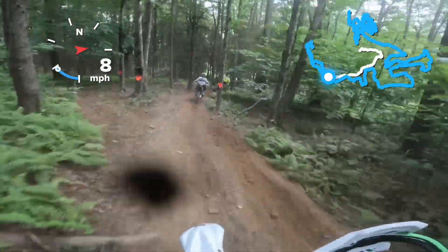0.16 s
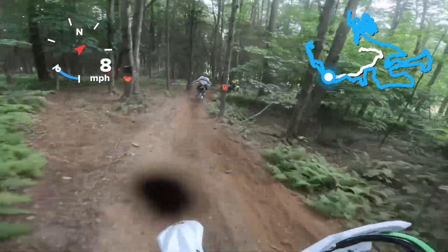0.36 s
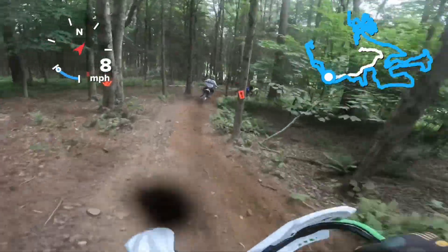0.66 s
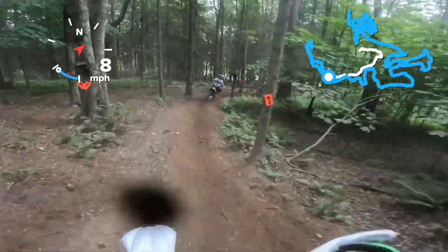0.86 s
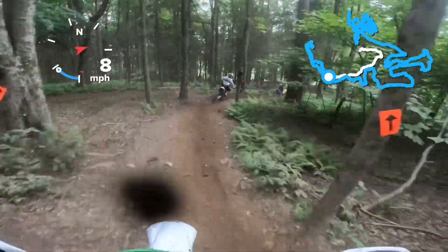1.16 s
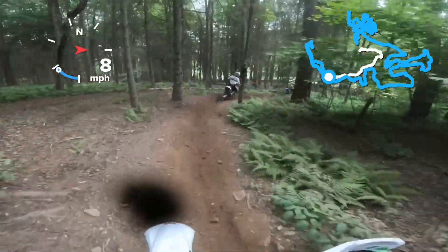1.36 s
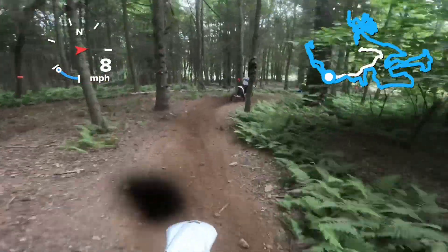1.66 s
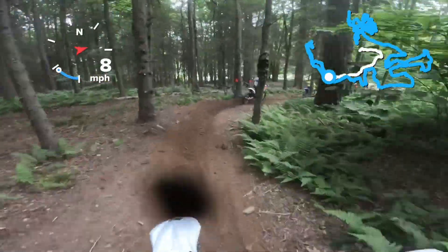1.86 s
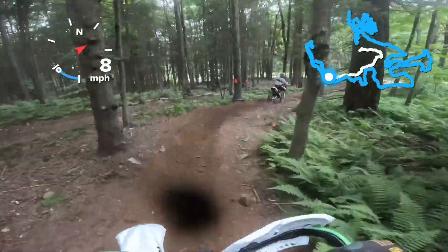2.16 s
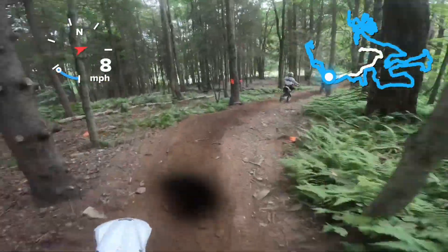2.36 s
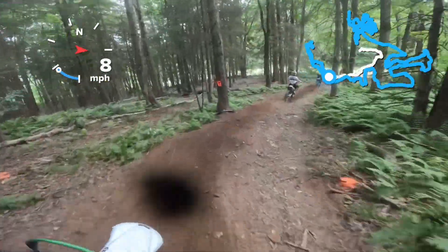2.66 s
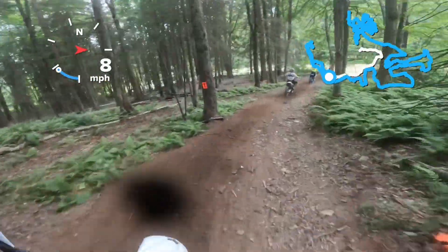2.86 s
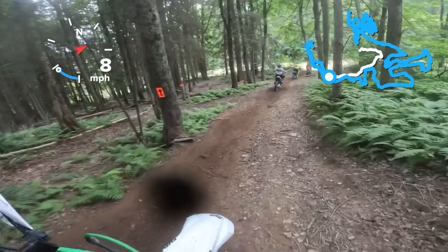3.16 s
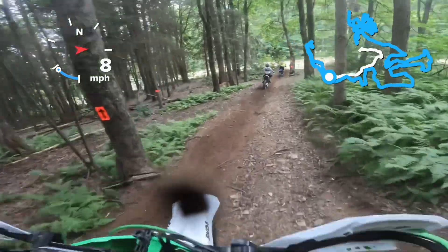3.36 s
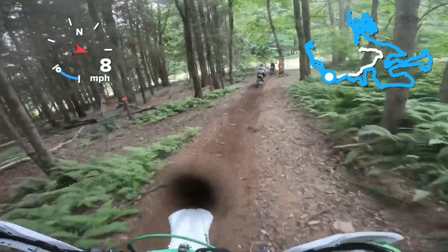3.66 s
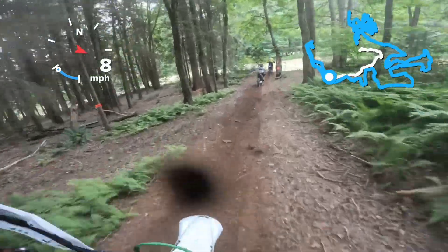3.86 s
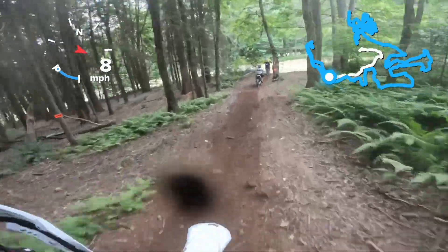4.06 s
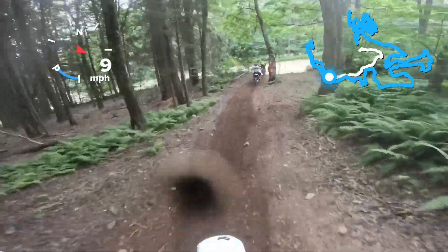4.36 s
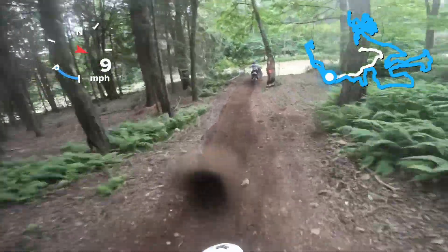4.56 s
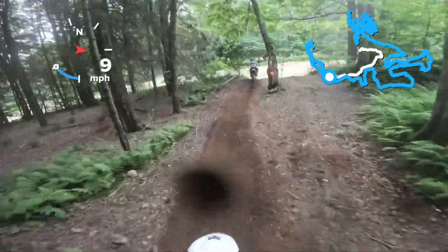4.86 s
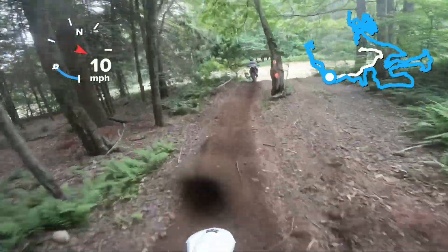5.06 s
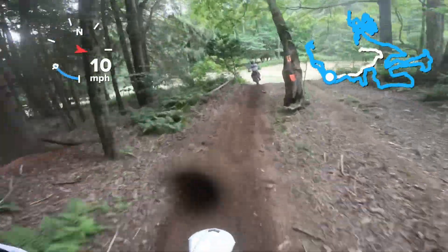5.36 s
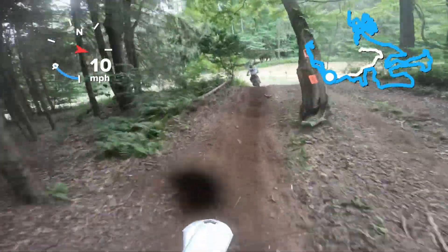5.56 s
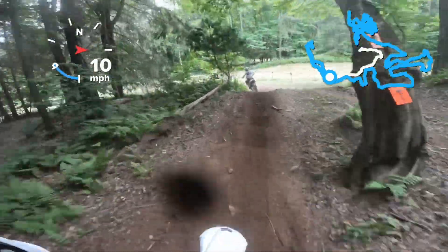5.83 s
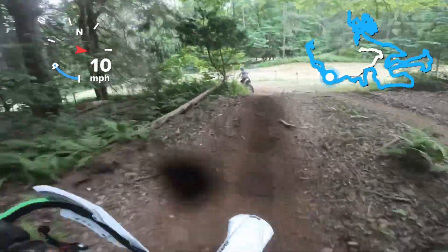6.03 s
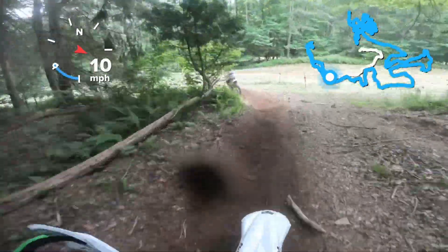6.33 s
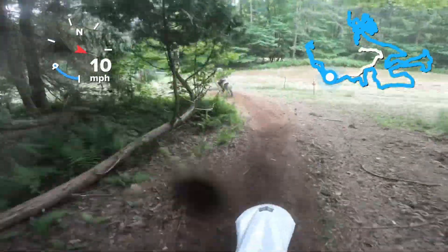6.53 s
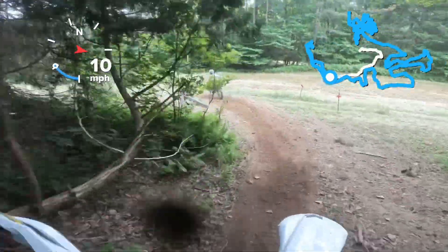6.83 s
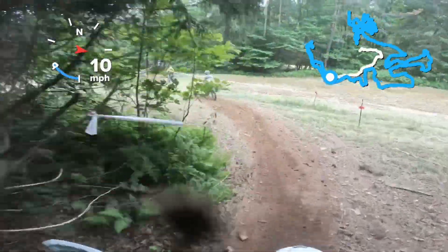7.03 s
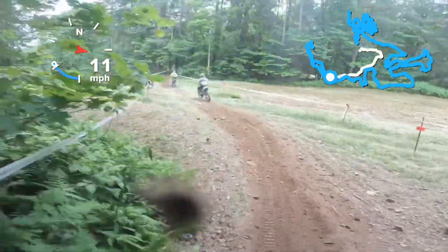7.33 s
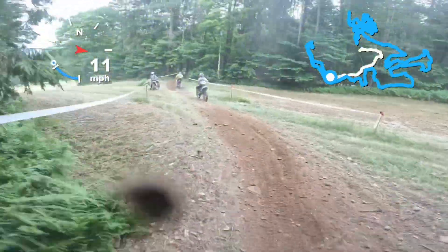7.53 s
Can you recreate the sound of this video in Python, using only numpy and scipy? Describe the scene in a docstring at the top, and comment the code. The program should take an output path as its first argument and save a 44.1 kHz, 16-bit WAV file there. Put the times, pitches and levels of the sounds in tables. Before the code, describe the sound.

A single-cylinder two-stroke dirt bike climbs a forest trail, heard from the rider's helmet. Its exhaust pops unevenly and misfires at low revs, under a metallic engine rattle, a faint gear whine and low wind buffeting. Stones knock and chassis parts clink. Past the middle the throttle opens briefly and the engine pings sharply. A second bike then revs twice nearby while the first drops back to a sputter.

```python
"""Exhaust pops, some misfiring, under metallic engine rattle and low wind buffeting: a single-cylinder
two-stroke dirt bike climbs a forest trail, heard from the rider's helmet. Each firing rings the pipe;
the crank gates noise through fins and housing. Gears whine, stones and gear knock, the chassis clinks,
and the engine pings at high revs. Near the end a second bike revs twice nearby."""
import sys
import numpy as np
from scipy import signal
from scipy.fft import rfft, irfft, next_fast_len
from scipy.io import wavfile
from scipy.ndimage import uniform_filter1d

SR = 44100
rng = np.random.default_rng(int(sys.argv[2]) if len(sys.argv) > 2 else 0)


def wav_record(signal):
    """Record a signal, one row per channel, as 16-bit PCM in the file named by sys.argv[1]."""
    frames = np.transpose(np.atleast_2d(signal))
    bounded = np.clip(frames, -1, 1)
    # unit amplitude maps onto the largest positive 16-bit level
    quanta = np.round(bounded * 32767).astype(np.int16)
    wavfile.write(sys.argv[1], SR, quanta)


N = 339129
TIME = np.arange(N) / SR
FFT_SIZE = 2 * next_fast_len(N // 2 + 4096)
HZ = np.fft.rfftfreq(FFT_SIZE, 1 / SR)

# Crank speed, one firing a turn. Each row: time in seconds, rate in Hz.
CRANK_HZ = [(0, 38.68), (0.26, 26.85), (0.42, 32.76), (0.74, 34.72), (1, 28.07), (1.28, 30.34),
            (1.42, 22.19), (1.6, 21.62), (1.72, 26.35), (2.04, 31.2), (2.48, 31.01), (2.6, 24.53),
            (2.8, 32.05), (3.08, 31.11), (3.22, 34.5), (3.56, 33.39), (3.68, 28.77), (3.86, 34.85),
            (4.26, 35.04), (4.38, 37), (4.55, 42.6), (4.63, 40.6), (4.76, 45.3), (4.84, 39.8), (4.94, 38.8),
            (5.04, 40.6), (5.17, 42), (5.36, 41.3), (5.45, 41.9), (5.65, 44.3), (5.84, 41), (6.02, 43.42),
            (6.32, 39.5), (6.44, 30.8), (7.2, 30.23), (7.7, 38.47)]
# Engine levels. Each row: time in seconds, then rattle, pop and drone level in dB.
ENGINE_DB = [(0, -35, -17.5, -35), (0.3, -35.5, -15.5, -32), (0.8, -35, -17, -33.5),
             (1.45, -39.5, -18.5, -41), (2.1, -39.5, -21.5, -49), (2.55, -38, -19, -29.5),
             (2.95, -38, -19, -40), (3.3, -38.5, -22.5, -42.5), (3.68, -38.5, -20, -33.5),
             (3.8, -35, -17, -36), (4.25, -35.5, -18, -29), (4.45, -33, -12.5, -25),
             (4.62, -32.5, -13, -23.5), (4.71, -29.5, -9, -29), (4.77, -30.5, -12.5, -45),
             (4.795, -31, -14, -37), (4.808, -33.5, -17.5, -30), (5.35, -37.5, -22.5, -29),
             (5.52, -32.5, -17.5, -27), (5.9, -34.5, -22, -29.5), (6.3, -35.5, -21.5, -26.5),
             (6.7, -39.5, -21.5, -51), (7.05, -40, -21.5, -53), (7.3, -39, -18, -37.5),
             (7.5, -38, -18.5, -34), (7.69, -36, -17, -32)]


def amp(db):
    """Decibels to gain."""
    return 10 ** (np.asarray(db) / 20)


def unit_rms(x):
    """Scale to rms 1."""
    return x / np.sqrt(np.mean(x ** 2) + 1e-20)


def spectrum(points):
    """Interpolate a table over log frequency."""
    hz, value = np.transpose(points)
    return np.interp(np.log(HZ + 1), np.log(hz + 1), value)


def curves(rows):
    """Interpolate each column over time."""
    times_s, *columns = np.transpose(rows)
    return [np.interp(TIME, times_s, column) for column in columns]


def drift(samples):
    """Smoothed noise, rms 1."""
    return unit_rms(uniform_filter1d(uniform_filter1d(rng.standard_normal(N), samples), samples))


def spell(start_s, end_s, rise_s, fall_s):
    """Trapezoid with ramps centred on start and end."""
    corners_s = [start_s - rise_s / 2, start_s + rise_s / 2, end_s - fall_s / 2, end_s + fall_s / 2]
    return np.interp(TIME, corners_s, [0, 1, 1, 0])


def ring(modes, rise_s):
    """Decaying sines, soft onset, peak 1. Each mode: frequency in Hz, level in dB, T60 in seconds."""
    t = np.arange(4000) / SR
    sound = sum(amp(db - 60 * t / t60_s) * np.sin(2 * np.pi * hz * t) for hz, db, t60_s in modes)
    sound *= 1 - np.exp(-(t / rise_s) ** 2)
    return sound / abs(sound).max()


def minimum_phase(db):
    """Causal response for a gain curve, power gain 1."""
    log_gain = np.log(amp(np.maximum(db, db.max() - 100)))
    response = np.exp(np.conj(signal.hilbert(np.r_[log_gain, log_gain[-2:0:-1]])))[:len(HZ)]
    return response / np.sqrt(np.mean(abs(response) ** 2))


def firings(turns, load, coast):
    """One impulse a turn, sized by how well the charge burns."""
    # Firings that hardly burn, and that half burn. Each entry: time in seconds.
    misfires_s = [0.038, 0.156, 0.257, 0.329, 0.396, 0.463, 0.582, 0.78, 0.873, 1.007, 1.079, 1.317, 1.533,
                  1.92, 1.99, 2.05, 2.571, 2.723, 2.789, 3.075, 3.784, 3.93, 4.378, 6.408, 6.534, 6.6, 6.77,
                  6.831, 6.896, 7.058]
    weak_s = [1.70, 1.78, 1.85, 2.14, 2.21, 2.28, 2.40, 2.50, 2.65, 2.85, 3.25, 3.34, 3.40, 7.124, 7.19,
              7.26, 7.38, 7.47, 7.62]
    at = np.flatnonzero(np.diff(np.floor(turns)) > 0)
    burn_db = 1.8 * (1 - .7 * load[at]) * rng.standard_normal(len(at))  # steadier under load
    skip_db, slip_chance = -8, .2  # coasting weakens every second firing; the pattern can slip
    burn_db += skip_db * coast[at] * (np.cumsum(rng.random(len(at)) > slip_chance) % 2)
    for times_s, loss_db in ((misfires_s, -12), (weak_s, -4.5)):
        burn_db[abs(TIME[at, None] + .004 - times_s).argmin(axis=0)] += loss_db
    train = np.zeros(N)
    train[at] = amp(burn_db)
    return train


def silencer(pops, full):
    """Swallows the crack; full flow pushes more through. The pipe radiates little deep bass."""
    light_sos = np.r_[signal.ellip(8, .5, 60, 418, fs=SR, output="sos"),
                      signal.butter(2, 103, "high", fs=SR, output="sos")]
    full_sos = np.r_[signal.butter(8, 435, fs=SR, output="sos"),
                     signal.butter(4, 160, "high", fs=SR, output="sos")]
    return signal.sosfilt(light_sos, (1 - full) * pops) + signal.sosfilt(full_sos, full * pops)


def exhaust(turns):
    """Pressure pulses and ragged flow ring the pipe; low crank orders drone on."""
    # Pipe modes, light throttle and loaded. Each row: frequency in Hz, level in dB, T60 in seconds.
    light_modes = [(385, -4, 0.011), (339, -7.5, 0.034), (238, -2, 0.013), (214.7, 4, 0.031)]
    loaded_modes = [(420, 9, 0.0057), (282.7, 6.5, 0.019), (241.5, -6, 0.1)]
    # Drone. Each row: crank order, level in dB, change in dB at full throttle and when coasting.
    orders = [(2, 1.5, 0, 0), (3, -11, -12, 0), (4, -17, -6, 3), (6, -30, 0, 12), (8, -30, 0, 6),
              (9, -24, 0, 9)]
    _, pop_db, drone_db = curves(ENGINE_DB)
    full = spell(4.37, 4.8, .02, .02)  # throttle wide open
    coast = spell(4.8, 6.4, .02, .04)  # eased at high revs
    lug = .085 * np.maximum(31.4 - curves(CRANK_HZ)[0], 0)  # load grows as revs sink
    load = np.clip(.29 + .2 * drift(500) + lug + 2 * full + .47 * coast, 0, 1)
    train = firings(turns, load, coast)
    echo_lag, echo_db = round(.0064 * SR), -9  # return from the pipe's far end
    train[echo_lag:] += amp(echo_db + 2 * drift(500)[echo_lag:]) * ((1 - full) * train)[:-echo_lag]
    flow = amp(-11 - 8 * full + 3 * coast) * rng.standard_normal(N) / np.sqrt(SR / 35)
    drive = amp(pop_db) * (train + flow)
    pops = sum(signal.oaconvolve(drive * share, ring(modes, rise_s=.00088))[:N]
               for share, modes in ((1 - load, light_modes), (load, loaded_modes)))
    pops = silencer(pops, full)
    drone = np.zeros(N)
    for order, db, full_db, coast_db in orders:
        gain = amp(db + full_db * full + coast_db * coast + 2 * drift(2500))
        drone += gain * np.sin(2 * np.pi * order * (turns + .006 * drift(900)))
    return np.array([amp(-.7) * pops, amp(.7) * np.roll(pops, 3)]) + amp(drone_db) * drone


def metal(body, treble):
    """Resonances of engine metal and housing; the two drives cross over at 3300 Hz."""
    # Broad response. Each row: frequency in Hz, relative level in dB.
    shape = [(300, -41), (420, -10.5), (548, -12.5), (944, -13), (1160, -11.5), (1430, -3), (1820, -4.5),
             (2120, -16.5), (2330, -13), (2770, -3.5), (3300, -11), (5140, -18.5), (6880, -20), (8640, -37),
             (11000, -54.5), (14200, -61.5)]
    # Fin and housing resonances. Each row: centre in Hz, width in Hz, lift in dB.
    peaks = [(735, 39, 8), (953, 163, 9.5), (1421.4, 76, 9), (1772, 55, 7), (1951, 51, 7.5), (2824, 28, 6),
             (3037, 50, 3.5), (3860, 210, 5), (5014, 590, 10), (6650, 59, 7), (11700, 3660, 11.5)]
    peaks_db = sum(lift_db / (1 + (2 * (HZ - hz) / width_hz) ** 2) for hz, width_hz, lift_db in peaks)
    share = 1 / (1 + (3300 / (HZ + 1)) ** 4)
    drive = (1 - share) * rfft(body, FFT_SIZE) + share * rfft(treble, FFT_SIZE)
    return irfft(minimum_phase(spectrum(shape) + peaks_db) * drive, FFT_SIZE)[..., :N]


def rattle(turns):
    """Metallic noise gated by the crank, in bursts that vary from turn to turn."""
    # Bursts in each turn. Each row: position in turns, width in turns, relative size.
    bursts = [(.36, 0.099, 0.39), (.85, 0.11, 0.1)]
    treble_db = .6 * drift(2100) - .4
    drives = []
    for steady, spread_db in ((1.2, 5.8), (1.6, 3.5)):  # body, treble
        sizes = amp(spread_db * np.minimum(rng.standard_normal((400, len(bursts))), 1.8))
        gate = steady + sum(size * sizes[turns.astype(int), k] * np.exp(-((turns % 1 - at) / width) ** 2)
                            for k, (at, width, size) in enumerate(bursts))
        drives.append(gate * amp(drift(25) + .87 * drift(2900)) * rng.standard_normal((2, N)))
    return amp(curves(ENGINE_DB)[0] + 1.5) * unit_rms(metal(drives[0], drives[1] * amp(treble_db)))


def wind():
    """Lumpy low buffeting on the microphone housing, stronger on the left."""
    # Gusts. Each row: time in seconds, level in dB.
    gusts = [(0.0, -22), (0.06, -28), (0.23, -13.5), (0.34, -24), (1.48, -14.5), (1.52, -18.5),
             (1.95, -14.5), (2.36, -28), (2.37, -19.5), (2.7, -15.5), (2.78, -27), (2.87, -13), (3.79, -25),
             (3.83, -16), (3.88, -25), (3.98, -30), (4.03, -14), (4.11, -31), (4.8, -15), (4.86, -26),
             (4.95, -10), (4.99, -18), (5.14, -15.5), (5.25, -30), (5.42, -19.5), (6.92, -15.5),
             (7.05, -23.5), (7.35, -17), (7.5, -26), (7.69, -21)]
    # Buffet spectrum. Each row: frequency in Hz, relative level in dB.
    buffet = [(1.8, -47), (3.0, 10), (16, 5.5), (27, 4), (42, -17.5), (70, -15), (130, -19.5), (170, -45),
              (290, -120)]
    white = rfft(rng.standard_normal((2, N)), FFT_SIZE)
    common, side = irfft(white * amp(spectrum(buffet)), FFT_SIZE)[:, :N]
    gain = amp(curves(gusts)[0] + drift(2500))
    lumps = gain * unit_rms(np.array([common + .016 * side, common - .036 * side]))
    limit = .36  # the membrane flattens the largest swings
    return limit * np.tanh(lumps / limit) * amp([[1.6], [-1.6]])


def whines():
    """Narrow noise on gliding pitches: a gear whine and a thin high buzz that arches up and sinks."""
    # Pitch tracks. Each row: time in seconds, frequency in Hz, level in dB.
    gear_track = [(0, 1850, -53), (.7, 1960, -43), (.82, 1820, -40), (1.9, 1781, -53), (2.25, 1755, -40),
                  (2.7, 1790, -43), (3, 1960, -43.5), (3.5, 1960, -49), (4, 1633, -52), (5.4, 1818, -42),
                  (5.7, 1940, -49), (7.69, 1784, -51)]
    arch_track = [(0, 2910, -62), (.15, 2970, -45), (.35, 3120, -48), (.5, 3160, -40), (.62, 3090, -44.5),
                  (.75, 3010, -53), (.85, 2950, -80)]
    sound = np.zeros(N)
    for hz, db in (curves(gear_track), curves(arch_track)):
        fuzz = drift(234) + 1j * drift(240)
        sound += amp(db) * (fuzz * np.exp(2j * np.pi * np.cumsum(hz) / SR)).real
    return sound


def scuffed_rings(turns):
    """Single modes of the metal swell and fade, scuffed unevenly once a turn."""
    # Swells. Each row: start in seconds, length in seconds, frequency in Hz, level in dB.
    swells = [(0.069, 0.57, 2810, -36), (0.21, 0.32, 3420, -40), (0.42, .4, 3760, -41),
              (0.83, 0.48, 2790, -39), (2.96, 0.56, 3400, -39), (5, 0.42, 2800, -35),
              (8.1, 0.24, 2800, -35), (0.16, 1, 1410, -32), (.15, 0.31, 1790, -31), (3.38, 0.47, 1500, -37),
              (5.45, 0.17, 1410, -26), (2.335, 0.24, 1300, -36), (7.0, 0.72, 1430, -34),
              (2.11, .07, 5080, -30), (2.25, .15, 5050, -41), (2.9, .25, 5100, -37), (3.58, .12, 4980, -35),
              (2.52, .22, 3760, -36), (3.05, .16, 3800, -40), (3.3, 0.13, 3760, -40),
              (7.22, 0.2, 5500, -45), (7.56, 0.097, 5100, -41), (8.8, .09, 2800, -35),
              (5.9, .22, 2800, -41), (.55, .25, 1950, -33), (.78, .25, 1770, -27), (.9, .17, 2740, -40),
              (5.4, 0.055, 1300, -36), (4.55, 0.073, 1420, -32), (4.72, 0.068, 1420, -26),
              (4.4, .1, 1420, -36), (4.55, 0.036, 2790, -29), (5.55, .18, 2810, -27.5),
              (5.7, .035, 1420, -27.5)]
    scuff_s, max_t60_s, max_t60_cycles = .014, .045, 110
    ticks = (np.diff(np.floor(turns + .55), prepend=0) > 0) * amp(2 * drift(250))
    scuffs = uniform_filter1d(ticks, round(scuff_s * SR)) * np.sqrt(scuff_s * SR)
    sound = np.zeros(N)
    for start_s, length_s, hz, db in swells:
        part = slice(int(max(start_s - length_s / 2, 0) * SR), int((start_s + 1.5 * length_s) * SR))
        drive = (scuffs * amp(db) * spell(start_s, start_s + length_s, length_s / 2, length_s / 2))[part]
        mode = ring([(hz, 0, min(max_t60_s, max_t60_cycles / hz))], rise_s=.001)
        sound[part] += signal.oaconvolve(drive * rng.standard_normal(len(drive)), mode)[:len(drive)]
    return sound


def knocks():
    """Stones and gear strike: a clank plus a dying noise burst through the metal."""
    # Hits. Each row: time in seconds, level in dB, treble lift in dB, clank offset in dB.
    hits = [(0.222, -30, 13, -11), (0.7975, -21.5, 9, -15), (1.511, -23.5, 3, -3), (1.561, -20, 7, -0.5),
            (1.588, -21, -17, -0.5), (1.614, -25, -12, -14), (2.1216, -22, 2, -25), (2.146, -31, 11, -19),
            (2.511, -19.5, -0.5, -22), (3.568, -30, 11, -18), (3.752, -31, -9, 6), (3.809, -29, 3, -7),
            (5.741, -29, 9, -15), (5.776, -33, 15, -19), (5.798, -29, 9, -17), (6.214, -25, 14, -17),
            (6.4225, -43, 8, -15), (6.7744, -37, 9, -21)]
    # Clank modes. Each row: frequency in Hz, level in dB, T60 in seconds.
    clank_modes = [(1410, 5.5, 0.053), (920, -7, 0.052), (1724, -3, 0.045), (6630, -7.5, 0.034)]
    t60_s, rise_s = .1, .00058
    body, treble, blows = np.zeros((3, N))
    t = TIME[:SR // 8]
    burst = amp(-9.5 - 60 * t / t60_s) * (1 - np.exp(-t / rise_s))
    for time_s, db, lift_db, clank_db in hits:
        at = int(time_s * SR)
        body[at:at + len(t)] += burst * amp(db)
        treble[at:at + len(t)] += burst * amp(db + lift_db)
        blows[at] = amp(db + clank_db)
    noise = rng.standard_normal((2, N))
    clanks = signal.oaconvolve(blows, ring(clank_modes, rise_s=.0016))[:N]
    return metal(body * noise, treble * noise) + clanks * [[1], [.3]]


def clinks():
    """Light chassis parts ring a high and a low group of short modes."""
    # Hits. Each row: time in seconds, level in dB, low group offset in dB.
    hits = [(0.8, -24.5, -8), (1.9923, -32, -4), (2.7116, -35, -3), (3.46, -33, -4), (3.481, -28, -1),
            (3.5667, -32, -8), (3.6415, -33, -4), (4.2945, -29, -6), (4.7645, -28, -4), (5.4205, -31, -4),
            (5.4719, -31, -4), (5.5013, -29, -4), (5.6639, -28, 0), (5.7422, -29, -6), (5.7757, -24, -6),
            (5.7971, -27, -4), (6.4212, -30, -10), (7.3316, -25.5, -4), (7.5506, -32, -4)]
    # Chassis modes. Each row: frequency in Hz, level in dB, T60 in seconds.
    high_modes = [(5103, -5, 0.021), (4920, -4, .02), (6660, -13, .02)]
    low_modes = [(3650, -1, 0.018), (2780, -5, .04)]
    high, low = np.zeros((2, N))
    for time_s, db, low_db in hits:
        at = int(time_s * SR)
        high[at], low[at] = amp(db), amp(db + low_db)
    return (signal.oaconvolve(high, ring(high_modes, rise_s=.001))
            + signal.oaconvolve(low, ring(low_modes, rise_s=.0006)))[:N]


def ping(turns):
    """Spells of engine pinging: a sharp metallic tick late in each turn."""
    # Spells. Each row: start in seconds, length in seconds, level in dB, fade in seconds.
    spells = [(4.63, 0.095, -15.5, 0.05), (5.543, 0.29, -24.5, 0.63)]
    # Ping modes. Each row: frequency in Hz, level in dB, T60 in seconds.
    modes = [(735, 2, 0.031), (1420, 3, .04), (1787, 7, 0.033), (2560, 5.5, 0.029), (2772, 11, 0.042),
             (3026, 5, 0.03), (4715, 5, 0.028), (5080, 7, 0.025)]
    ticks = np.diff(np.floor(turns + .18), prepend=0) > 0
    gain = sum(amp(db) * spell(start_s, start_s + length_s + fade_s / 2, .026, fade_s) ** 2
               for start_s, length_s, db, fade_s in spells)
    return signal.oaconvolve(ticks * gain * amp(drift(200)), ring(modes, rise_s=.00089))[:N]


def second_bike():
    """Another engine revs: a ragged buzz of crank orders and a bright puff of hiss per firing."""
    # Revs. Each row: start, climb, hold and release in seconds, then start and top values of
    # firing rate in Hz, level in dB and treble bite in dB.
    revs = [(5.79, .26, .11, .12, 108, 133.5, -40, -30.5, 1, 0),
            (6.622, .06, .005, .06, 122, 139, -36, -35, 1, -3)]
    # Pipe response. Each row: frequency in Hz, level in dB.
    pipe = [(500, -17), (700, -10.5), (900, -8), (1080, -10), (1200, -5.5), (1340, 3), (1470, -0.5),
            (1600, -5), (1750, 2.5), (1900, -2), (2100, -17), (2400, -7), (2700, -13), (3100, -14),
            (3400, -10), (3750, -5), (3900, -10)]
    attack_s, sag_hz_per_s, rough_db, rough_step_s = .025, 120, 4.5, .026
    hz, gain, bite = np.full(N, 120.), np.zeros(N), np.zeros(N)
    for start_s, climb_s, hold_s, release_s, from_hz, top_hz, from_db, top_db, *bite_db in revs:
        top_s = start_s + climb_s
        shut_s = top_s + hold_s
        rev_hz = np.interp(TIME, [start_s, top_s, shut_s, shut_s + release_s],
                           [from_hz, top_hz, top_hz, top_hz - sag_hz_per_s * release_s])
        gate = spell(start_s, shut_s + release_s / 2, attack_s, release_s)
        hz = np.where(gate > 0, rev_hz, hz)
        gain += gate ** 2 * amp(np.interp(TIME, [start_s, top_s], [from_db, top_db]))
        bite += gain * (gate > 0) * amp(np.interp(TIME, [start_s, top_s], bite_db))
    turns = np.cumsum(hz * (1 + .007 * drift(500))) / SR
    pipe_hz, pipe_db = np.transpose(pipe)
    buzz, on = np.zeros(N), gain > 0
    steps_s = np.arange(0, TIME[-1] + 1, rough_step_s)
    tilt_db_per_octave = .35 * (hz[on] - hz.max() + 5)  # brightens as it climbs
    for order in range(5, 30):
        db = rough_db * np.interp(TIME[on], steps_s, rng.standard_normal(len(steps_s)))
        db += tilt_db_per_octave * np.log2(order * hz[on] / 1100)
        db += np.interp(order * hz[on], pipe_hz, pipe_db)
        buzz[on] += amp(db) * np.cos(2 * np.pi * (order * turns[on] + rng.random()))
    sizes = amp(2.5 * rng.standard_normal(2000))[turns.astype(int)]
    puffs = (.55 + sizes * np.exp(-(turns % 1) / .52)) * rng.standard_normal(N)
    crisp = np.diff(puffs, prepend=0)  # favours the top octave
    hiss = metal(.19 * gain * puffs, bite * (crisp + .62 * puffs))
    hiss /= np.std(metal(.2 * puffs, crisp + .13 * puffs))
    return gain * amp(-10) * unit_rms(buzz) + amp(-4) * hiss


def ports(mid, side):
    """Two microphone ports: mid in phase, side in antiphase, then a balance and a phase lead."""
    # Port likeness. Each row: frequency in Hz, likeness from 0 to 1.
    likeness = [(300, .98), (500, .75), (1000, .95), (2000, .75), (4000, .96), (8000, .995), (10500, .97),
                (12500, .5)]
    # Balance. Each row: frequency in Hz, left minus right in dB.
    balance_db = [(60, 0.5), (100, 0.0), (180, -0.5), (310, -1.5), (530, -2.5), (920, -3.0), (1590, -3.5),
                  (2750, -4.0), (4740, 1.5), (8190, 0.0), (12000, -1.5)]
    # Phase. Each row: frequency in Hz, lead of the left port in radians.
    lead_rad = [(0, 0), (600, -0.5), (1210, -0.75), (1550, -0.44), (1890, 1.86), (2150, 0.1), (2410, 1.5),
                (2670, 0.86), (3190, 1.44), (3450, 0.93), (4050, 0.79), (4310, 0), (8350, 0)]
    same = np.clip(spectrum(likeness), 0, 1)
    shared = np.sqrt((1 + same) / 2) * rfft(mid, FFT_SIZE)
    opposed = np.sqrt((1 - same) / 2) * rfft(side, FFT_SIZE)
    tilt = amp(spectrum(balance_db) / 2) * np.exp(.5j * spectrum(lead_rad))
    return irfft(np.array([(shared + opposed) * tilt, (shared - opposed) / tilt]), FFT_SIZE)[:, :N]


def scene():
    """Metal sounds, whines and second bike through the ports, plus exhaust and wind."""
    start_turns, pop_lead_s = .5, .0058  # a pop starts this long before its peak
    turns = np.interp(TIME + pop_lead_s, TIME, np.cumsum(curves(CRANK_HZ)[0]) / SR) + start_turns
    clatter = rattle(turns) + knocks()
    bike, whine = second_bike(), whines()
    mid = clatter[0] + ping(turns) + scuffed_rings(turns) + clinks() + bike + whine
    side = clatter[1] + .5 * bike + .1 * whine
    return ports(mid, side) + exhaust(turns) + wind()


def record(dry):
    """Low-pass at 14750 Hz."""
    return signal.oaconvolve(dry, signal.firwin(511, 14750, window=("kaiser", 9), fs=SR)[None], "same")


dry = scene()
out = record(dry)
wav_record(out)
```